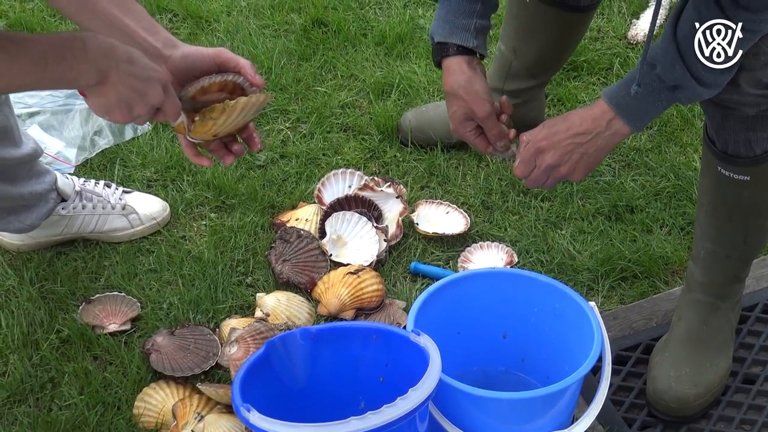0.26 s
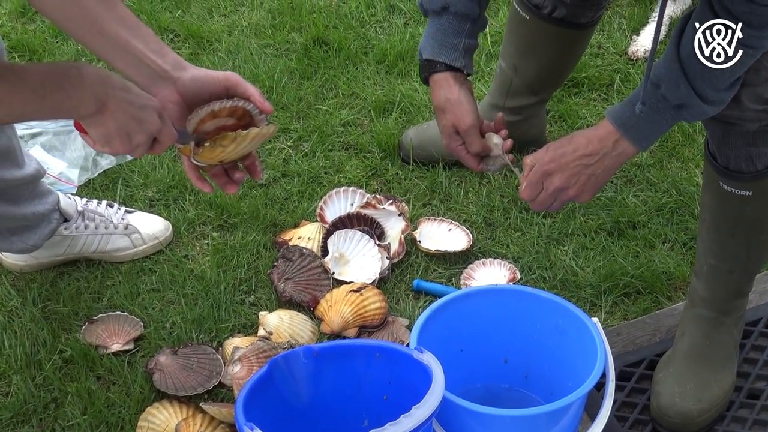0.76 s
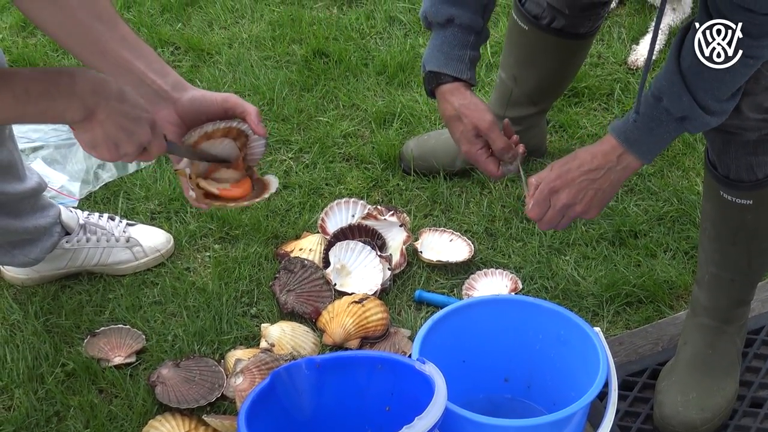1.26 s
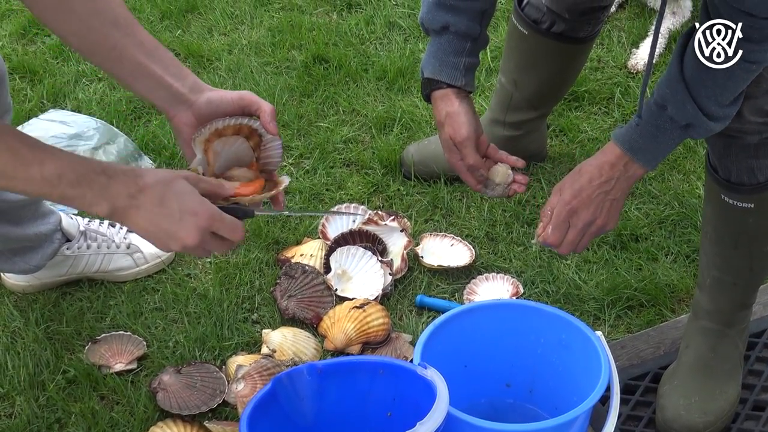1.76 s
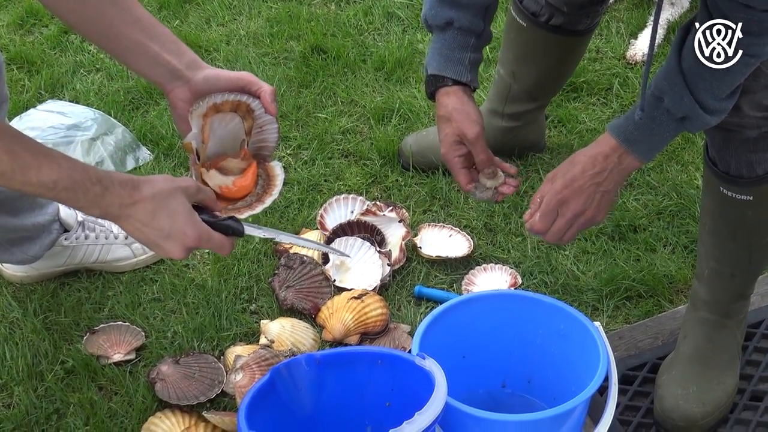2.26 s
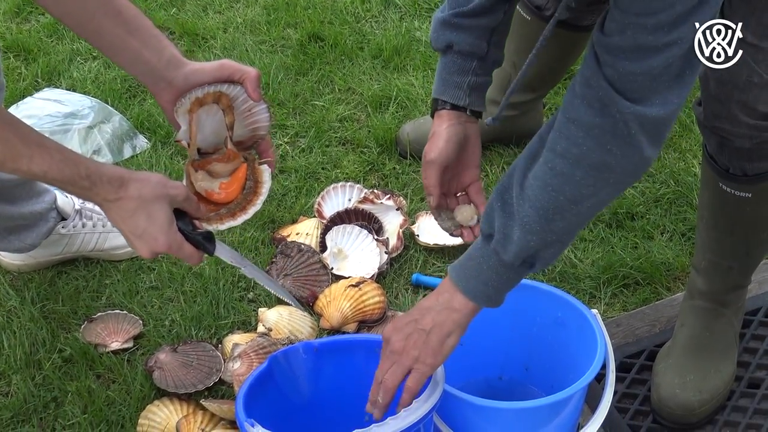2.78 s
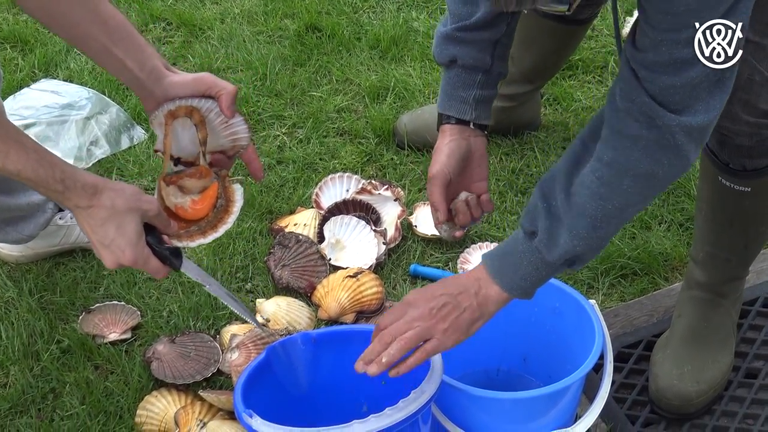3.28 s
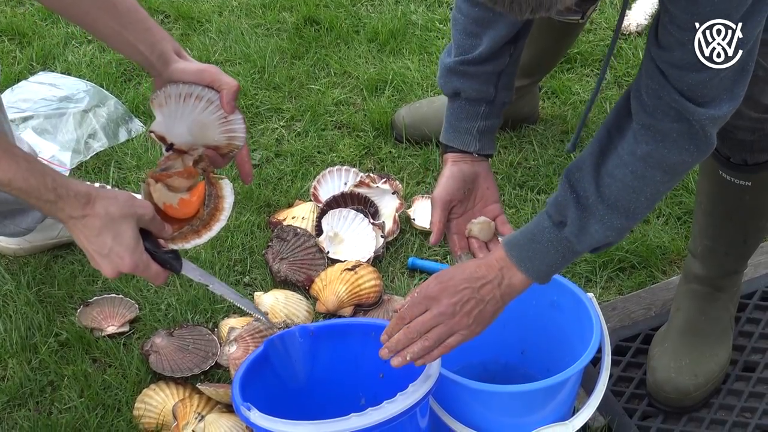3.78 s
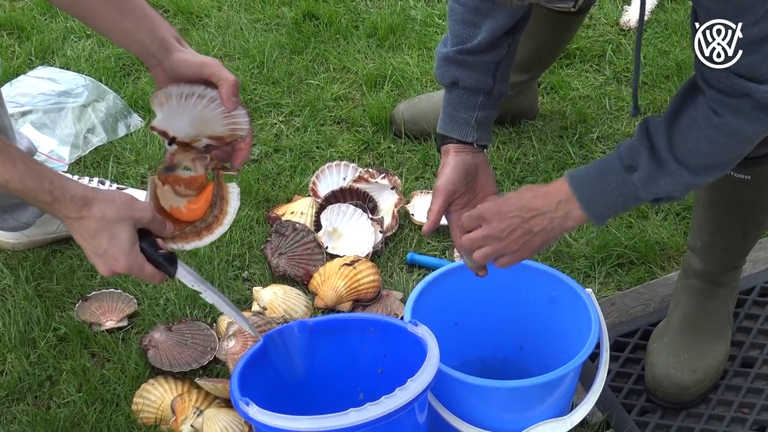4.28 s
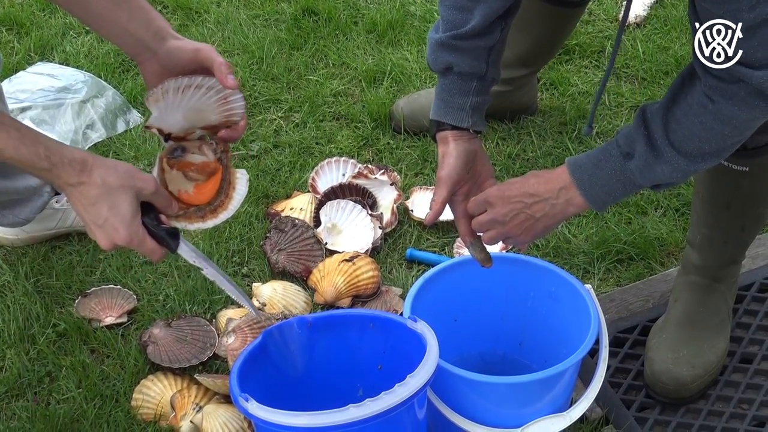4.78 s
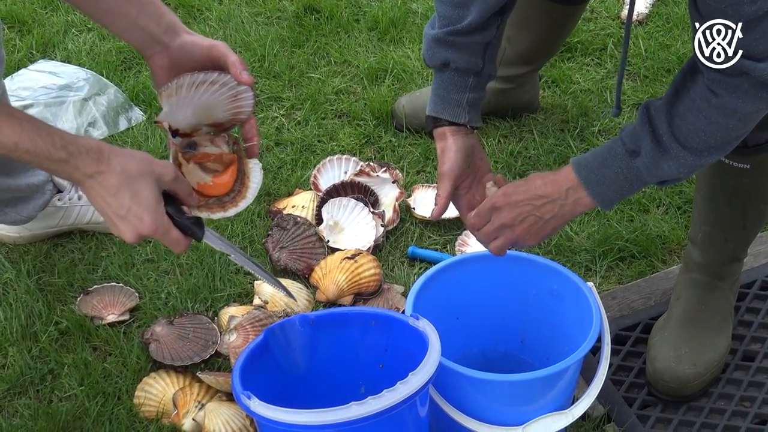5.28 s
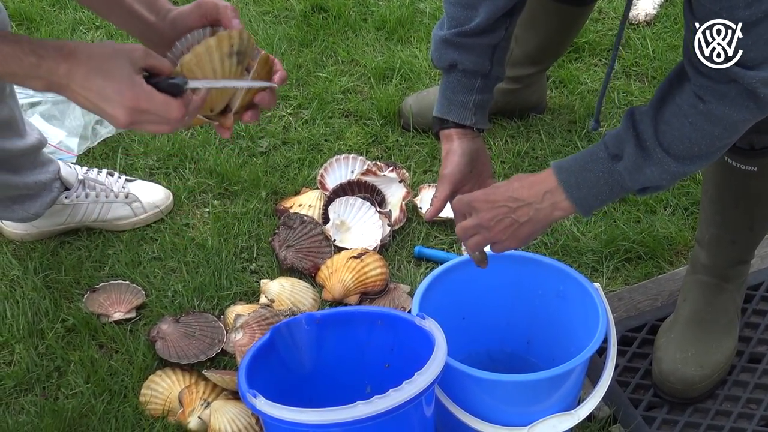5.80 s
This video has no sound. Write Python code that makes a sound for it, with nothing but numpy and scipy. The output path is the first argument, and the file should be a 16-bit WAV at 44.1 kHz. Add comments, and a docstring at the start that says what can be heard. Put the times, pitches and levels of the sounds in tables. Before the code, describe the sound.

Close gritty shell cracks and scrapes give way to small wet clicks and a final hard clack, with bright chirps over low outdoor rumble.

```python
"""A knife cracks and scrapes through a scallop shell on a lawn: noise bursts and jerky slips ring shell modes.
The same contact model makes wet ticks on the meat and the clack of the two halves; thumps are 80 Hz pulses.
A sparrow close by sings gliding near sines and further birds whistle single bending tones.
A distant engine idles as harmonics of its firing rate; rumble and air are coloured noise.
Random echoes surround shell and birds."""
import sys
import numpy as np
from scipy import signal
from scipy.fft import rfft, irfft
from scipy.io import wavfile
from scipy.ndimage import uniform_filter1d

SR = 44100
rng = np.random.default_rng(int(sys.argv[2]) if len(sys.argv) > 2 else 0)


def unload_wav(signal):
    """Save mono or channel-first audio to the path in sys.argv[1] as 16-bit WAV at rate SR, clipped to [-1, 1]."""
    wavfile.write(
        sys.argv[1],
        SR,
        np.round(np.clip(np.atleast_2d(signal).T, -1, 1) * 32767).astype(np.int16),
    )


N = 266364
TIME = np.arange(N) / SR


def from_db(db):
    """Decibels to amplitude gain."""
    return 10 ** (np.asarray(db) / 20)


def rms_one(x):
    """Scale to rms 1."""
    return x / np.sqrt(np.mean(x ** 2) + 1e-20)


def add(out, start_s, sound):
    """Mix a sound into out at start_s."""
    at = max(0, round(start_s * SR))
    out[at:at + len(sound)] += sound[:max(0, N - at)]


def passed(x, hz, kind, order=2):
    """Butterworth filter."""
    sos = signal.butter(order, np.minimum(hz, SR / 2 - 1), kind, fs=SR, output="sos")
    return signal.sosfilt(sos, x)


def drift(rate_hz, size):
    """Random knots at rate_hz joined by straight lines; spread near 1."""
    knots = np.arange(size) * rate_hz / SR
    count = int(knots[-1]) + 2
    values = rng.standard_normal(size)[:count]
    return np.interp(knots, np.arange(count), values)


def coloured_noise(spectrum):
    """Steady noise of a given spectrum, rms 1."""
    hz, db = np.transpose(spectrum)
    bins_hz = np.maximum(np.fft.rfftfreq(N, 1 / SR), 1)
    gain = from_db(np.interp(np.log(bins_hz), np.log(hz), db))
    return rms_one(irfft(rfft(rng.standard_normal(N)) * gain, N))


def garden(x, wet_db, t60_s):
    """Scattered, slightly dull echoes from ground, fences and walls."""
    t = TIME[:SR // 2]
    echoes = rng.standard_normal(len(t)) * (t > .003) * from_db(-60 * t / t60_s)
    echoes = passed(echoes, 11400, "low", order=1)
    echoes = echoes / np.sqrt(np.sum(echoes ** 2))
    return x + from_db(wet_db) * signal.fftconvolve(x, echoes)[:N]


# low air noise, relative spectrum: pitch_hz [Hz], density_db [dB per Hz]
RUMBLE_SPECTRUM = [(12, 4), (25, 2), (45, 4), (80, 0.5), (120, -3), (180, -11), (260, -24.5), (500, -45)]
RUMBLE_BASE_DB = -34.5


def rumble(gain_db):
    """Low-pitched noise of the air."""
    return from_db(RUMBLE_BASE_DB + gain_db) * coloured_noise(RUMBLE_SPECTRUM)


# upper air noise, relative spectrum: pitch_hz [Hz], density_db [dB per Hz]
AIR_SPECTRUM = [(120, -37), (200, -4.5), (268, 0), (347, -2), (432, -3), (1420, -13), (1560, -14.5),
                (3560, -18.5), (3900, -18), (4270, -20), (5420, -21.5), (13800, -29), (16000, -42)]
AIR_BASE_DB = -45


def air(gain_db):
    """Broad noise that falls off towards the treble."""
    return from_db(AIR_BASE_DB + gain_db) * coloured_noise(AIR_SPECTRUM)


# idling engine harmonics: order [multiple of firing rate], level_db [dB rms before gain and fading]
ENGINE_ORDERS = [(2, -49), (3, -38), (4, -63), (5, -43.5), (6, -44.5), (7, -56.5), (10, -59.5), (13, -58)]
MEAN_FIRING_HZ = 26.94


def engine(gain_db, wander=.006, fading_db=3.5):
    """Only the low orders carry this far, each fading in and out on its way."""
    turns = np.cumsum(MEAN_FIRING_HZ * (1 + wander * drift(5, N))) / SR
    out = np.zeros(N)
    for order, level_db in ENGINE_ORDERS:
        gain = from_db(level_db + fading_db * drift(9, N))
        out += gain * np.sqrt(2) * np.sin(2 * np.pi * (round(order) * turns + rng.random()))
    return from_db(gain_db) * out


# dull thumps on the turf: start_s [s], level_db [dB, envelope peak]
THUMP_EVENTS = [(3.345, -16), (5.099, -22.5), (5.471, -25)]


def thumps(pitch_hz=80, rise_s=0.011):
    """Soft blows on the ground swell and die within a few cycles."""
    out, t = np.zeros(N), TIME[:SR // 6]
    envelope = t / rise_s * np.exp(1 - t / rise_s)
    for start_s, level_db in THUMP_EVENTS:
        add(out, start_s, from_db(level_db) * envelope * np.sin(2 * np.pi * pitch_hz * t))
    return out


def bird_tone(pitch_hz, level_db, waver, flutter_db):
    """A near sine whose pitch and strength waver."""
    size = len(pitch_hz)
    phase = 2 * np.pi * np.cumsum(pitch_hz * (1 + waver * drift(512, size))) / SR
    gain = from_db(level_db + flutter_db * drift(170, size))
    return gain * np.sin(phase) * signal.windows.tukey(size, .04)


# distant single whistles: start_s [s], length_s [s], first_hz [Hz], last_hz [Hz], level_db [dB]
FAR_WHISTLES = [(0, .018, 3380, 3350, -27), (.72, .093, 3820, 3890, -44.5), (4.02, .09, 5030, 5250, -51),
                (4.85, .028, 4610, 4270, -49), (4.91, .048, 3520, 3620, -51), (5.109, .17, 3480, 3590, -50),
                (5.728, .069, 3760, 3680, -47), (5.834, .036, 3110, 3110, -39.5),
                (5.926, .04, 3710, 3740, -39), (5.988, .02, 3640, 3520, -38), (6.004, .03, 3050, 2450, -41)]
# one distant bird's repeated rising slur: start_s [s]
SLUR_STARTS = [4.16, 4.325, 4.49, 4.68]
SLUR_LENGTH_S, SLUR_FIRST_HZ, SLUR_LAST_HZ, SLUR_LEVEL_DB = .122, 4220, 5300, -51


def far_birds():
    """Whistles that start level and bend faster towards their end."""
    out = np.zeros(N)
    slurs = [(start_s, SLUR_LENGTH_S, SLUR_FIRST_HZ, SLUR_LAST_HZ, SLUR_LEVEL_DB)
             for start_s in SLUR_STARTS]
    for start_s, length_s, first_hz, last_hz, level_db in FAR_WHISTLES + slurs:
        part = np.linspace(0, 1, max(round(length_s * SR), 64))
        pitch_hz = first_hz + (last_hz - first_hz) * part ** 2.4
        tone = bird_tone(pitch_hz, level_db, waver=0.018, flutter_db=3.0)
        add(out, start_s, tone * signal.windows.tukey(len(part), .4))
    return out


# chirp notes, pitches before the song's pitch factor and sag:
# delay_s [s], length_s [s], first_hz [Hz], held_hz [Hz], fall_s [s], note_db [dB re chirp]
LOW_CHIRP = [(0, .072, 6900, 3900, .0112, -.5), (.079, .058, 4900, 3400, .014, -7.5)]
HIGH_CHIRP = [(0, .09, 7100, 4770, .0145, 1), (.104, .04, 5000, 4280, .023, -5.5)]
STEP_CHIRP = [(0, .042, 7100, 5700, .012, .5), (.028, .07, 5700, 3500, .018, -1),
              (.119, .032, 4850, 4250, .02, -9)]
# sparrow's song: start_s [s], chirp [note table], level_db [dB before fade], pitch_factor [ratio]
SPARROW_SONG = [(0.263, LOW_CHIRP, -18, 1.005), (.550, HIGH_CHIRP, -16, 1.005), (.858, STEP_CHIRP, -18, 1),
                (1.183, LOW_CHIRP, -19.5, 1.03), (1.487, LOW_CHIRP, -22, 1.007),
                (1.808, HIGH_CHIRP, -19.5, 1.0), (2.134, STEP_CHIRP, -21.5, 1.0),
                (2.482, LOW_CHIRP, -22, 1.013), (2.797, STEP_CHIRP, -26.5, 0.98)]
NOTE_ATTACK_S, NOTE_RELEASE_S, NOTE_FADE_DB_PER_S = .016, .012, 305
NOTE_SAG_HZ_PER_S, FALL_SHAPE = 2100, 2.1   # before pitch factor; the fall starts gently, then plunges
THIN_ABOVE_HZ, THIN_DB_PER_KHZ = 5600, 4.0   # voice thins at the top; pitch before factor


def sparrow():
    """Each note drops steeply on to a slightly sagging pitch and fades; a chirp is two or three notes."""
    out = np.zeros(N)
    for start_s, chirp, level_db, pitch_factor in SPARROW_SONG:
        for delay_s, length_s, first_hz, held_hz, fall_s, note_db in chirp:
            t = TIME[:round(length_s * SR)]
            fall = np.exp(-(t / fall_s) ** FALL_SHAPE)
            glide_hz = held_hz + (first_hz - held_hz) * fall - NOTE_SAG_HZ_PER_S * t
            attack = np.sin(np.pi / 2 * np.minimum(t / NOTE_ATTACK_S, 1)) ** 2
            release = np.clip((length_s - t) / NOTE_RELEASE_S, 0, 1)
            fade_db = NOTE_FADE_DB_PER_S * np.maximum(t - NOTE_ATTACK_S, 0)
            thin_db = THIN_DB_PER_KHZ * np.maximum(glide_hz - THIN_ABOVE_HZ, 0) / 1000
            tone_db = level_db + note_db - fade_db - thin_db
            tone = bird_tone(pitch_factor * glide_hz, tone_db, waver=.008, flutter_db=2.4)
            add(out, start_s + delay_s, attack * release * tone)
    return out


def shell_ring(force, modes, body_db, edge_db, scatter_db, ring_hz=(), ring_db=13.0,
               grip=.012, body_hz=1700, edge_hz=7000):
    """Force rings modes; contact place favours low body, high edge or one resonance; grip detunes."""
    out = 0
    chances = rng.standard_normal((len(modes), 2))
    for k, ((pitch_hz, width_hz, level_db), (level_chance, pitch_chance)) in enumerate(zip(modes, chances)):
        body_tilt_db = body_db / (1 + (pitch_hz / body_hz) ** 6)
        edge_tilt_db = edge_db / (1 + (edge_hz / pitch_hz) ** 6)
        favour_db = sum(ring_db * np.exp(-(np.log(pitch_hz / f) / .11) ** 2) for f in ring_hz)
        mode_db = level_db + body_tilt_db + edge_tilt_db + favour_db + scatter_db * level_chance
        r = np.exp(-np.pi * width_hz / SR)
        turn = 2 * np.pi * pitch_hz * (1 + grip * pitch_chance) / SR
        mode = signal.lfilter([1, 0, -1], [1, -2 * r * np.cos(turn), r * r], force)
        out = out + (-1) ** k * (1 - r * r) * from_db(mode_db) * mode
    return out


def contacts(rows, modes, crumble, crumble_s, chatter, chatter_s, scatter_db):
    """Snap, quick crumbling and longer faint chatter; level is that of the loudest millisecond."""
    out, t = np.zeros(N), TIME[:SR // 12]
    decay = crumble * np.exp(-t / crumble_s) + chatter * np.exp(-t / chatter_s)
    for start_s, level_db, body_db, edge_db, *ring_hz in rows:
        force = rng.standard_normal(len(t)) * decay
        force[0] += 1   # snap
        sound = shell_ring(force, modes, body_db, edge_db, scatter_db, ring_hz)
        loudest = np.sqrt(uniform_filter1d(sound ** 2, SR // 1000).max())
        add(out, start_s, from_db(level_db) * sound / loudest)
    return out


# shell halves meeting: start_s [s], level_db [dB], body_db [dB], edge_db [dB], ring_hz [Hz, optional]
CLACK_EVENTS = [(1.954, -21, -8, 0, 2300), (5.6515, -17.5, 2, 3), (5.7945, -21, -10, 6, 2100),
                (5.872, -12, 1, -1), (5.880, -23.5, 2, -4, 1700)]
# cupped shell resonances before detuning: pitch_hz [Hz], width_hz [Hz], level_db [dB, relative]
CUPPED_MODES = [(413, 130, -7.5), (773, 115, -2.5), (1130, 220, -8), (1560, 135, 0.5), (1950, 260, -2),
                (2300, 170, -0.5), (3200, 230, -15), (4100, 280, -13), (5200, 330, -14), (6000, 210, -15.5),
                (7000, 450, -21), (9600, 450, -22.5), (11500, 820, -31)]


def clacks():
    """Shell halves knock together and ring as a cupped body."""
    return contacts(CLACK_EVENTS, CUPPED_MODES, crumble=0.037, crumble_s=0.0019,
                    chatter=0.034, chatter_s=0.007, scatter_db=0.5)


# blade and fingers on meat: start_s [s], level_db [dB], body_db [dB], edge_db [dB], ring_hz [Hz, optional]
TICK_EVENTS = [(1.784, -28, -10, -8, 5000), (1.891, -27.5, -7, -10), (1.920, -35, 8.5, -8),
               (2.483, -25, 9, -4), (2.490, -23.5, 10, 4), (2.573, -25.5, 2, 1), (2.579, -29, 6, 2),
               (2.643, -28, 4, 13), (2.746, -28, 2, 3, 1600), (2.846, -22, 2, -4), (2.873, -25.5, 4, 5),
               (3.138, -35, 0, 4), (3.463, -22.5, -4, 0), (3.558, -33.5, -2, 2), (3.855, -36.5, -3, 1),
               (3.923, -34, 2, -1), (4.351, -24.5, 2, 1, 3660), (4.471, -30, 0, 2, 3650),
               (5.187, -35, 8, -4, 3500), (5.250, -35, 4, 2, 3550), (5.831, -22, 9, 0),
               (5.852, -30, -11, 10)]
# open shell resonances before detuning: pitch_hz [Hz], width_hz [Hz], level_db [dB, relative]
OPEN_MODES = [(1050, 130, -11), (1594, 153, 1.5), (2050, 360, -9), (2380, 240, -6.5), (3250, 250, 3.5),
              (3650, 280, 1.5), (4200, 570, 0), (4870, 560, -3), (5590, 330, 2.5), (6820, 660, -5),
              (8150, 680, -8.5), (9500, 550, -6.5), (10700, 600, -8.5), (13000, 3400, -19.5)]


def wet_ticks():
    """Blade and fingers on the meat excite the open shell."""
    return contacts(TICK_EVENTS, OPEN_MODES, crumble=.25, crumble_s=0.0014,
                    chatter=.08, chatter_s=.007, scatter_db=2.0)


# strength of fingering, centre of random spread: time_s [s], level_db [dB]
FINGERING_LEVELS = [(1.9, -39), (2.15, -50), (2.45, -43), (2.9, -37), (3.25, -39), (3.8, -41), (4.1, -47),
                    (4.4, -45), (4.8, -58), (5.3, -48), (6.0, -43)]


def wet_crackle(per_s=20, spread_db=4.0, body_db=1.5, max_edge_db=5.0):
    """Faint random ticks for as long as the meat is being fingered."""
    time_s, level_db = np.transpose(FINGERING_LEVELS)
    count = round(per_s * (time_s[-1] - time_s[0]))
    rows = []
    for k, (jitter, size, hardness) in enumerate(rng.random((count, 3))):
        start_s = time_s[0] + (k + 2 * jitter - 1) / per_s
        tick_db = np.interp(start_s, time_s, level_db) + spread_db * (2 * size - 1)
        rows.append((start_s, tick_db, body_db, max_edge_db * hardness))
    return contacts(rows, OPEN_MODES, crumble=0.17, crumble_s=0.0011,
                    chatter=.04, chatter_s=.005, scatter_db=2.5)


# closed shell resonances before detuning: pitch_hz [Hz], width_hz [Hz], level_db [dB, relative]
SHELL_MODES = [(794, 113, -12.5), (1027, 46, 2), (1190, 130, -6), (1389, 82, -4), (1522, 70, 0.5),
               (1667, 70, -4.5), (1900, 170, -3), (2176, 105, 5), (2463, 140, 1.5), (2664, 144, 0.5),
               (2990, 200, -2.5), (3273, 180, 2.5), (3506, 180, 1.5), (3690, 250, 2), (4260, 120, -0.5),
               (4740, 280, -4.5), (5290, 200, -0.5), (5770, 270, -2.5), (6400, 226, -3.5),
               (7280, 380, -9.5), (8710, 500, -10), (10100, 800, -12.5), (12700, 2300, -21.5)]
# blade and finger drags: start_s [s], length_s [s], strongest_share [of length], level_db [dB at strongest],
# body_db [dB], edge_db [dB], ring_hz [Hz, optional]
SCRAPE_EVENTS = [(.011, .089, .4, -27.5, 4, -2), (.159, .071, .55, -21.5, 2, 1.5),
                 (.428, .07, .25, -22, 0, -2), (.529, .052, .18, -20.5, 1, 7), (.663, .07, .1, -35, 4, -3),
                 (.905, .08, .42, -22, 1, 2), (1.016, .062, .26, -22, 6, 0),
                 (1.10, .038, .58, -21.5, 3, -1), (1.184, .08, .28, -30.5, 4, -1, 2400),
                 (1.258, .045, .55, -29, 5, -5), (1.339, .034, .1, -27.5, 1, 4, 2350),
                 (1.358, .063, .63, -22.5, 3, 3, 2350), (2.32, .14, .5, -47, -4, -3),
                 (2.474, .026, .45, -29, 6, 5), (2.834, .085, .55, -39, 6, -1),
                 (3.779, .13, .35, -48, 0, 3), (4.445, .032, .75, -39.5, 0, -3),
                 (5.162, .11, .65, -50, 9, -4), (5.662, .045, .6, -33.5, 11, -5)]
SHELL_OPENS_S = 1.16


def scrapes(slips_per_s=8000, grit_db=2.2, judder_db=3.4, judder_hz=220, ends_db=-14, top_hz=11500):
    """Blade slips in dense tiny jerks, juddering over ribs; the shell rings thinner once open."""
    out, t = np.zeros(N), TIME[:SR // 5]
    for start_s, length_s, strongest_share, level_db, body_db, edge_db, *ring_hz in SCRAPE_EVENTS:
        # three points of the blade take turns to bite, each with its own colour
        slips = (rng.random((3, len(t))) < slips_per_s / SR) * rng.standard_normal((3, len(t)))
        roughness_db = grit_db * rng.standard_normal(len(t)) + judder_db * drift(judder_hz, len(t))
        slips = slips * from_db(roughness_db)
        modes = SHELL_MODES if start_s < SHELL_OPENS_S else OPEN_MODES
        sound = np.zeros(len(t))
        for point in slips:
            ring = shell_ring(point, modes, body_db, edge_db, scatter_db=3.0, ring_hz=ring_hz, ring_db=7.0)
            sound += ring * from_db(4.0 * drift(70, len(t)))
        strongest_s = np.clip(strongest_share * length_s, .003, length_s)
        knots_s = [0, .003, strongest_s, length_s, length_s + .018]
        pressure = from_db(np.interp(t, knots_s, [-30, ends_db * .6, 0, ends_db, -60]))
        add(out, start_s, from_db(level_db) * pressure * rms_one(passed(sound, top_hz, "low")))
    return out


CHIPS_PER_S, CHIP_DB, CHIP_SPREAD_DB = 30, -1, 2.5   # level re scrape


def chips():
    """Rows of small random cracks along each scrape that prises at the closed shell."""
    rows = []
    for start_s, length_s, _, level_db, body_db, edge_db, *_ in SCRAPE_EVENTS:
        if start_s < SHELL_OPENS_S:
            for when, size in rng.random((round(CHIPS_PER_S * length_s), 2)):
                chip_db = level_db + CHIP_DB + CHIP_SPREAD_DB * (2 * size - 1)
                rows.append((start_s + when * length_s, chip_db, body_db, edge_db))
    return rows


# knife cracks: start_s [s], level_db [dB], body_db [dB], edge_db [dB], ring_hz [Hz, optional]
CRACK_EVENTS = [(.019, -21, -3, 7), (.031, -22, 18, 14), (.075, -17.5, 12.5, 2), (.174, -18.5, 2, -10),
                (.187, -11, 4.5, -11), (.423, -12.5, -3, -8), (.4415, -11.5, -8, -2),
                (.4573, -10, -1, 3, 3300), (.4677, -16.5, 3, 3), (.489, -22, 4, 3), (.530, -18, 4, 6),
                (.539, -11, -3, -6), (.544, -10, 2, -4), (.549, -6, -16, -4), (.555, -13, -10, -3, 2200),
                (.665, -14.5, -1, 0, 1460), (.703, -32, 15, 2), (.713, -24.5, 13, 3), (.9362, -12, -8, 5),
                (.9425, -12, -2, 7), (1.0213, -6, 5, 2), (1.0307, -8.5, 7, -17), (1.0455, -14, 5, 0),
                (1.066, -17.5, 0, -1, 3400), (1.100, -17, 4, 7), (1.1155, -15.5, 19, 0),
                (1.119, -5.5, -26, 0)]


def cracks():
    """Knife cracks and breaking chips ring the closed shell."""
    return contacts(CRACK_EVENTS + chips(), SHELL_MODES, crumble=0.068, crumble_s=0.0013,
                    chatter=.03, chatter_s=.005, scatter_db=3.0)


# background gains: time_s [s], engine_db [dB], rumble_db [dB], air_db [dB]
BACKGROUND_GAINS = [(0, 2.5, 5, 2.5), (1.4, 1, 2.5, 1), (2.5, -2.5, 2.5, 3), (3.6, -2.5, 2.5, 1.5),
                    (4.7, -4, 1, 1), (6.04, -4, 3, 2)]


def scene():
    """Shell work close by, birds around, engine and air behind."""
    time_s, *gains = np.transpose(BACKGROUND_GAINS)
    engine_db, rumble_db, air_db = [np.interp(TIME, time_s, gain) for gain in gains]
    background = air(air_db) + rumble(rumble_db) + engine(engine_db) + thumps()
    birds = garden(far_birds(), wet_db=-12, t60_s=0.48) + garden(sparrow(), wet_db=-9.5, t60_s=.3)
    shell_work = clacks() + wet_ticks() + wet_crackle() + scrapes() + cracks()
    hands = garden(shell_work, wet_db=-16, t60_s=.16)
    return (background + birds + hands)[None, :]


CUTOFF_HZ = 16100


def record(dry):
    """Peaks clip at 0.93, then a steep low-pass cuts the top."""
    low_pass = signal.ellip(10, .1, 90, CUTOFF_HZ, fs=SR, output="sos")
    return signal.sosfilt(low_pass, np.clip(dry, -.93, .93))


dry = scene()
out = record(dry)
unload_wav(out)
```